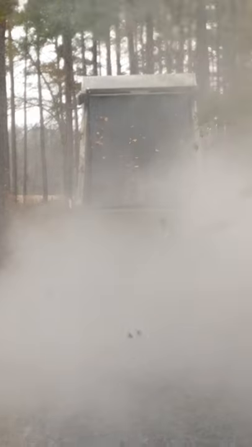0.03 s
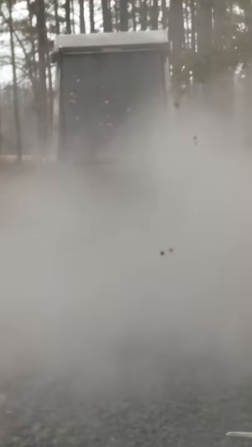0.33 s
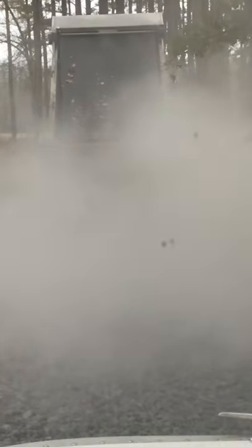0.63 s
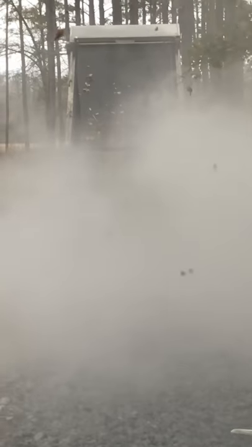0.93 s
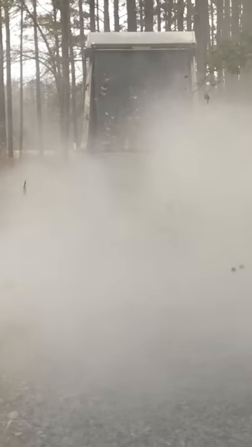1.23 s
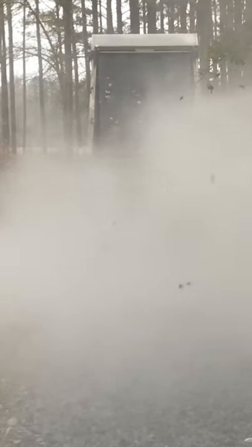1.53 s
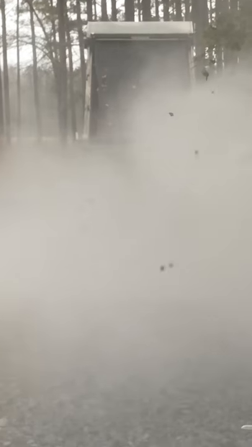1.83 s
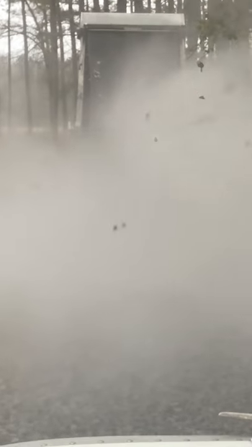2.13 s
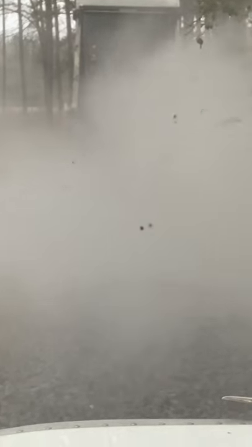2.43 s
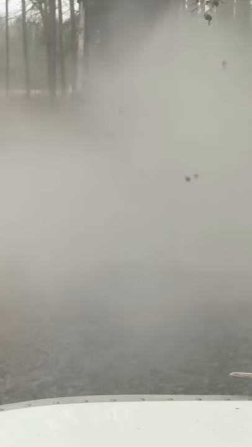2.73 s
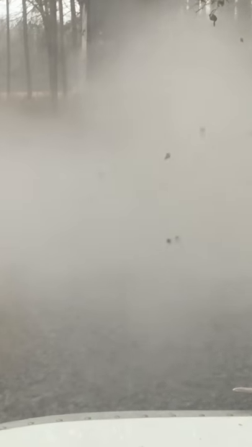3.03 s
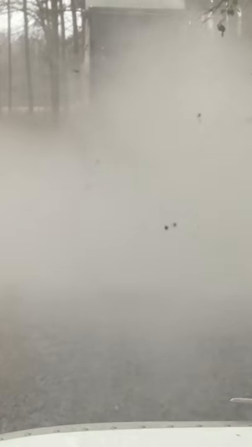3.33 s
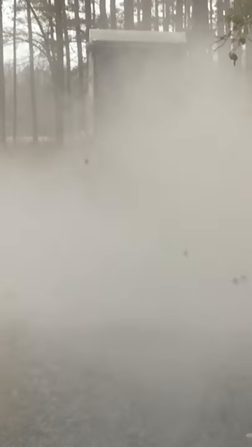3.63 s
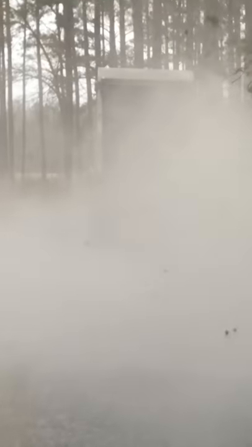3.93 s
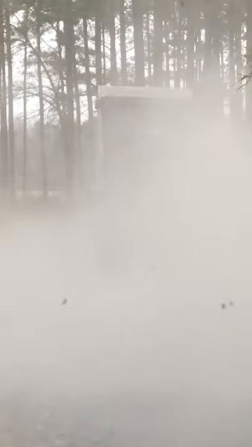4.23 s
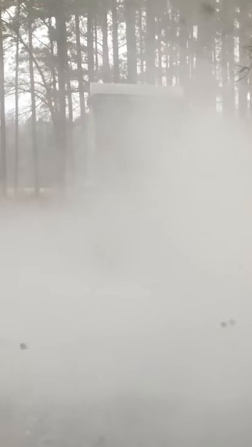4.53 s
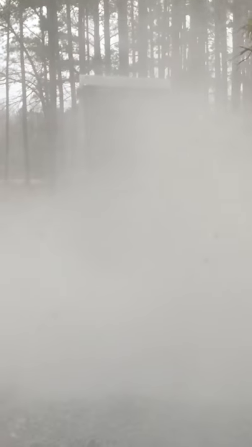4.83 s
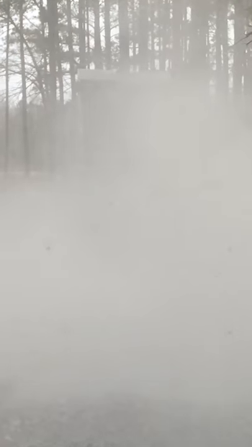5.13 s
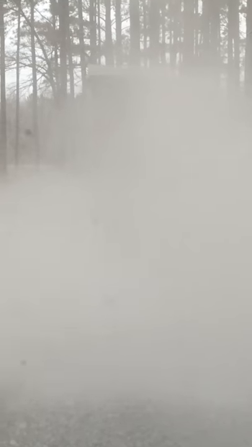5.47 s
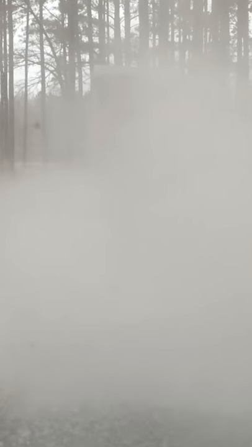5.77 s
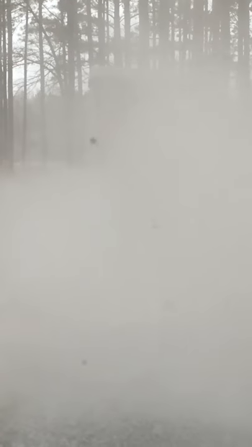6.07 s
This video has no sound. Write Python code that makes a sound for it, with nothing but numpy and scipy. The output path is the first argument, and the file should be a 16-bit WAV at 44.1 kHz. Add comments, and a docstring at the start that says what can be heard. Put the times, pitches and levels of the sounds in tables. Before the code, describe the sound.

A rush of tipped stone fades under droning engines while a vehicle cab knocks, thuds and rattles over loose gravel.

```python
"""A forest track, the microphone inside a vehicle following a dump truck that spreads gravel.
Ahead, stone pours in a dense rush, rings the steel dump body and runs out. Both engines drone on
over the rumble and crunch of tyres on loose stone. Close by, the cab jolts on the fresh gravel:
its body knocks, the floor thuds, loose parts clack and tinkle, and the trim squeaks."""
import sys
import numpy as np
from scipy import signal
from scipy.fft import rfft, irfft, next_fast_len
from scipy.io import wavfile

SR = 44100
rng = np.random.default_rng(int(sys.argv[2]) if len(sys.argv) > 2 else 0)


def transcribe(u):
    """Save the signal u as a 16-bit wav file named by the first command-line argument.

    u: samples, shape (n,) or (channels, n), limited to [-1, 1]; the rate is SR.
    q: integer samples, one column per channel.
    """
    v = np.clip(np.atleast_2d(u).T, -1, 1)
    q = np.round(v * 32767).astype(np.int16)
    wavfile.write(sys.argv[1], SR, q)


N = 273420
TIME = np.arange(N) / SR

# spectrum of the falling stone: frequency_hz, gain_db
POUR_COLOUR = [(120, -4), (175, 10), (260, -25), (380, -4.5), (700, -4.5), (850, -0.5), (1400, -2.5),
               (3650, -7), (5000, -15), (8500, -22), (10600, -30), (13000, -28), (16000, -36)]
# resonances of the steel dump body: pitch_hz, gain_db
DUMP_BODY_MODES = [(1000, 1), (1160, 0), (1380, 9), (1740, 6), (2480, 3), (3236, -1), (3700, 1)]
# slumps of the load that swell the flow: start_s, level_db
SLUMPS = [(0.762, -35), (1.168, -31.5), (1.581, -35), (1.72, -43), (2.04, -40)]
# exhaust of the truck ahead: time_s, firing_hz, level_db
TRUCK_DRONE = [(0, 100.5, -26.5), (.3, 101.1, -21), (.7, 102.2, -24.5), (.95, 102.6, -19.5),
               (1.33, 107.8, -26.5), (1.5, 105.5, -21), (1.68, 106.9, -26.5), (1.85, 106, -23),
               (2.13, 104.4, -25.5), (2.38, 101.7, -48), (2.6, 101.7, -26), (3.35, 106.1, -32.5),
               (4.1, 104, -40), (6.2, 95.1, -32.5)]
# throttle presses in the following vehicle: start_s, length_s, target_firing_hz
THROTTLE = [(1.94, 0.78, 42.35), (3.242, 1.07, 42.52), (5.165, .6, 41.22)]
# spells when its engine labours and the cab booms: start_s, length_s, level_db, growth_db_per_s
BOOMS = [(0, 1.97, -22, 2), (2.303, 0.31, -16, -21), (3.484, 0.85, -19.5, -3.5), (5.099, 0.22, -25, 21),
         (5.57, 0.244, -22, 8), (6.017, 0.32, -22.5, 10)]
# spectrum of the road rumble in the cab: frequency_hz, gain_db
ROAD_COLOUR = [(15, -26.5), (32, -3), (55, 2), (90, 7), (160, -6), (205, -4.5), (260, -14), (330, -10),
               (400, -16), (900, -62)]
# spectrum of stones under the tyres: frequency_hz, gain_db
CRUNCH_COLOUR = [(250, 4), (400, -6), (520, -0.5), (750, -2), (970, 0), (1300, -8), (1900, -13),
                 (2600, -14.5), (4000, -22.5), (5000, -26), (10500, -37), (16000, -46)]
# rough patches of track: start_s, length_s, boost_db
ROUGH_PATCHES = [(2.846, 0.31, 2.5), (5.05, 0.31, 2.5), (5.862, 0.39, 1.5)]
# knocks of the body around the microphone: start_s, level_db, ring_hz, ring_over_body_db, t60_s
KNOCKS = [(.068, -23, 1150, 2, 0.069), (0.499, -28.5, 1170, 7, 0.095), (0.867, -27.5, 1065, 13, 0.2),
          (2.235, -22, 1030, 7, 0.046), (2.643, -17.5, 910, 13, 0.03), (3.03, -36.5, 1370, -14, 0.34),
          (3.153, -24.5, 990, 12, 0.1), (3.932, -31.5, 983.4, 2, 0.075), (4.187, -30.5, 930, -2, 0.14),
          (5.21, -35, 640, 8, 0.2), (5.767, -31, 980, 0.5, 0.12), (6.022, -31.5, 800, 2, 0.072),
          (6.157, -30, 920, -4, 0.11)]
# modes of the following vehicle's body: pitch_hz, gain_db, t60_s
BODY_MODES = [(410, -6, 0.043), (615, 31.5, 0.04), (836, 29.5, 0.032), (1000, 29, 0.085),
              (1280, 29.5, 0.012), (1590, 2, 0.012), (2150, 1, 0.0098)]
# heavy jolts through the floor: start_s, level_db, ring_hz
THUDS = [(.002, -19.5, 202), (.425, -31, 426), (0.829, -23, 183), (.86, -27.5, 338.1), (1.115, -31, 360),
         (5.072, -25.5, 210), (5.629, -25, 201.1), (6.162, -27.5, 385)]
# loose parts clacking close by: start_s, level_db, t60_s, ring_hz
CLACKS = [(2.345, -46.5, 0.064, 9300), (2.576, -43, 0.056, 3330), (2.621, -43.5, 0.1, 3700),
          (2.638, -38.5, 0.066, 3880), (2.75, -53, .04, 14810), (3.092, -40, 0.039, 11600),
          (3.0986, -24, 0.015, 6200), (3.508, -52, 0.12, 6300), (3.731, -49, 0.03, 3960),
          (4.183, -42.5, 0.057, 3320), (4.218, -50, 0.036, 8560), (4.705, -36.5, .04, 4010),
          (4.724, -48, 0.14, 7080), (4.948, -45.5, 0.061, 2970), (5.143, -34.5, .05, 7100),
          (5.158, -40, .07, 8100), (5.259, -41, 0.083, 3720), (5.636, -44.5, 0.047, 5000),
          (5.767, -46, .1, 3400), (5.93, -44.5, .09, 3120), (6.063, -44.5, 0.079, 3535)]
# spectrum of a clack before its tilt: frequency_hz, gain_db
CLACK_COLOUR = [(500, -26), (1200, 6), (1600, 6), (3000, 7), (5000, 1.5), (8500, 0), (10500, -9),
                (12500, -2.5), (14000, -11), (16000, -24)]
# single stones under the wheels: start_s, level_db, ring_hz
CLATTERS = [(2.798, -36.5, 1501), (2.89, -37, 1380), (2.974, -39, 1290), (3.185, -44, 2603),
            (3.552, -38, 960), (4.589, -37, 1070), (5.076, -33.5, 1644), (5.33, -38.5, 1547),
            (6.125, -34.5, 1490)]
# small metal parts in the cab: start_s, level_db, first_mode_hz, second_mode_hz
TINKLES = [(2.487, -47, 13050, 7400), (2.526, -48, 12900, 7400), (2.967, -48, 13000, 7530),
           (4.074, -59, 11940, 9170), (5.733, -61, 9150, 11750), (5.979, -45, 9090, 11850)]
# squeaks of the trim: start_s, length_s, pitch_hz, level_db
SQUEAKS = [(3.207, 0.024, 5140, -68), (3.406, 0.049, 5150, -61), (4.18, 0.046, 5180, -56),
           (4.47, 0.056, 5110, -61), (4.775, .025, 5260, -60), (5.224, 0.052, 5190, -53.5),
           (5.475, 0.045, 5140, -52.5), (5.751, 0.023, 5240, -52.5)]
# soft scuffs in the cab: peak_s, level_db
SCUFFS = [(2.09, -50), (2.55, -57), (3.38, -49.5), (4.56, -56)]

FLOW_DB, THINNING_DB_PER_S, RUN_OUT_S, RUN_OUT_DB_PER_S = -30, 5, 2.3, 30
WHINE_TOP_S, WHINE_HALF_S, WHINE_HZ, WHINE_SAG_HZ = 1.8, 0.57, 810, 28.25
WHINE_DB, WHINE_FADE_DB = -45.5, 7.5
CRAWL_HZ, REV_UP_S, REV_DOWN_S, COASTING_DB = 32.06, 0.16, 0.42, -27
CAB_RESONANCE_HZ, CAB_HALF_WIDTH_HZ, OFF_THROTTLE_DB = 88.2, 6.5, -5.5
ROAD_DB, CRUNCH_DB = -26.5, -40.5
CLACK_PIVOT_HZ, CLACK_SNAP_DB, CLACK_RING_DB = 5600, 14.5, -10.5
SQUEAK_GLIDE_PER_S, SQUEAK_TRAIL_S, SQUEAK_FADE_DB_PER_S = 0.29, 0.014, 112


def amp(db):
    """Decibels to gain."""
    return 10 ** (np.asarray(db) / 20)


def unit(x):
    """Scales to rms 1."""
    return x / np.sqrt(np.mean(x ** 2) + 1e-20)


def phase_of(hz):
    """Running phase of a changing pitch, in radians."""
    return 2 * np.pi * np.cumsum(hz) / SR


def add(mix, start_s, sound):
    """Mixes a sound in at start_s."""
    part = mix[max(round(start_s * SR), 0):][:len(sound)]
    part += sound[:len(part)]


def spell(start_s, length_s, rise_s, fall_s):
    """An envelope that ramps up, holds to the end of its length and dies away."""
    age = TIME - start_s
    return np.clip(age / rise_s, 0, 1) * np.exp(-np.maximum(age - length_s, 0) / fall_s)


def colour(x, points):
    """Causal filter through points of frequency_hz, gain_db."""
    size = next_fast_len(len(x) + SR // 2)
    hz, db = np.transpose(points)
    bins_hz = abs(np.fft.fftfreq(size, 1 / SR))
    log_gain = np.log(amp(np.interp(np.log(bins_hz + 1), np.log(hz + 1), db)))
    minimum_phase = np.exp(np.conj(signal.hilbert(log_gain)))
    return np.fft.ifft(np.fft.fft(x, size) * minimum_phase).real[:len(x)]


def drift(hz):
    """Slow random motion of rms 1, up to about the given rate."""
    lowpass = np.exp(-(np.fft.rfftfreq(N, 1 / SR) / hz) ** 2)
    return unit(irfft(rfft(rng.standard_normal(N)) * lowpass, N))


def ring(x, hz, t60):
    """One damped mode, with gain 1 at its centre."""
    r = np.exp(-np.log(1000) / (t60 * SR))
    return 2 * signal.lfilter([1 - r], [1, -r * np.exp(2j * np.pi * hz / SR)], x).real


def resonate(x, hz, t60):
    """The same mode twice over, for steeper skirts, at rms 1."""
    return unit(ring(ring(x, hz, t60), hz, t60))


def impacts(per_s, spread_db):
    """Random clicks: many small, a few large."""
    size = amp(spread_db * np.minimum(rng.exponential(1, N), 4.5))
    return unit(size * rng.choice([-1, 1], N) * (rng.random(N) < per_s / SR))


def chatter(t60, rise_s, grain):
    """Rapid uneven contacts and, separately, the envelope of their dying burst."""
    t = np.arange(SR // 3) / SR
    noise = rng.standard_normal(len(t))
    roughness = np.exp(grain * np.repeat(rng.standard_normal(len(t)), 64)[:len(t)])
    fade = (1 - np.exp(-t / rise_s)) * np.exp(-np.log(1000) * t / t60)
    return unit(noise * roughness), fade


def stray_stones(per_s, low_hz, high_hz, t60, db, start_s):
    """Irregular hits from start_s on, each at its own pitch and up to 10 dB above db."""
    out = np.zeros(N)
    slots = np.arange(start_s, N / SR, 1 / per_s)
    for s, (late, pitch, size) in zip(slots, rng.random((len(slots), 3))):
        force, fade = chatter(t60, rise_s=t60 / 20, grain=0.78)
        hz = low_hz * (high_hz / low_hz) ** pitch
        add(out, s + late / per_s, amp(db + 10 * size) * resonate(force, hz, t60=0.004) * fade)
    return out


def gravel_pour():
    """Ahead, stones ring the steel body and land among larger lumps; the flow thins and runs out."""
    grains = impacts(per_s=5000, spread_db=1) + amp(-4) * rng.standard_normal(N)
    landing = unit(colour(grains, POUR_COLOUR))
    lumps = unit(stray_stones(per_s=45, low_hz=900, high_hz=1900, t60=0.05, db=0, start_s=0))
    strikes = impacts(per_s=1100, spread_db=2.5)
    modes = sum(amp(db) * ring(strikes, hz, t60=0.071) for hz, db in DUMP_BODY_MODES)
    wander_hz = 17.67 * drift(5.8)  # the modes shift as the load slides
    steel = unit((signal.hilbert(modes) * np.exp(1j * phase_of(wander_hz))).real)
    run_out_db = RUN_OUT_DB_PER_S * np.maximum(TIME - RUN_OUT_S, 0)
    steady = amp(FLOW_DB - THINNING_DB_PER_S * TIME - run_out_db)
    slumps = sum(amp(db) * spell(s, length_s=0.14, rise_s=0.029, fall_s=0.12) for s, db in SLUMPS)
    flow = np.hypot(steady, slumps) * amp(0.87 * drift(25))
    return flow * (landing + amp(-8.5) * steel + amp(-12) * lumps)


def dump_truck():
    """The exhaust drones up the track; as the truck tips, a thin whine arches in pitch and level."""
    times, firing_hz, level_db = np.transpose(TRUCK_DRONE)
    exhaust = np.sin(phase_of(np.interp(TIME, times, firing_hz)))
    drone = amp(np.interp(TIME, times, level_db)) * exhaust * (1 + 0.17 * drift(9.9))
    arch = np.minimum(((TIME - WHINE_TOP_S) / WHINE_HALF_S) ** 2, 10)
    whine_hz = (WHINE_HZ - WHINE_SAG_HZ * arch) * (1 + 0.0055 * drift(37))
    whine = amp(WHINE_DB - WHINE_FADE_DB * arch) * np.sin(phase_of(whine_hz))
    return np.sqrt(2) * (drone + whine)


def revs():
    """The near engine's firing rate climbs quickly under throttle and sinks slowly to a crawl."""
    hz = np.full(N, CRAWL_HZ)
    for s, length, target_hz in THROTTLE:
        pressed_s = np.clip(TIME - s, 0, length)
        released_s = np.maximum(TIME - s - length, 0)
        climb = target_hz + (np.interp(s, TIME, hz) - target_hz) * np.exp(-pressed_s / REV_UP_S)
        hz = np.where(TIME < s, hz, CRAWL_HZ + (climb - CRAWL_HZ) * np.exp(-released_s / REV_DOWN_S))
    return hz


def near_engine():
    """From the cab: the firing tone booms under load, its octave where it meets the cab's resonance."""
    hz = revs()
    phase = phase_of(hz * (1 + 0.0055 * drift(8.3)))
    boom = sum(amp(db + growth * np.clip(TIME - s, 0, length))
               * spell(s, length, rise_s=0.053, fall_s=0.045) for s, length, db, growth in BOOMS)
    coasting = amp(COASTING_DB) * (1 + 0.42 * drift(4.8))
    firing = np.maximum(boom, coasting) * np.sin(phase) * (1 + 0.12 * drift(4))
    detuning = (2 * hz - CAB_RESONANCE_HZ) / CAB_HALF_WIDTH_HZ
    cab_gain = amp(-29.5) + amp(-27) / (1 + detuning ** 2)
    throttle = sum(spell(s, length, REV_UP_S, fall_s=0.045) for s, length, _ in THROTTLE)
    octave_gain = cab_gain * amp(OFF_THROTTLE_DB * (1 - throttle))
    octave = octave_gain * np.sin(2 * phase + 1) * (1 + 0.09 * drift(4.5))
    upper_orders = sum(np.sin(k * phase) * (1 + drift(6.1) / 2) for k in range(3, 8))
    hum = 3 * np.sin(7.68 * phase)
    upper_gain = amp(-49.5 + 0.5 * (hz - 49))  # faint, rising with the revs
    return np.sqrt(2) * (firing + octave + upper_gain * (upper_orders + hum))


def road_rumble():
    """Tyres on loose stone shake the cab."""
    return amp(ROAD_DB) * unit(colour(rng.standard_normal(N), ROAD_COLOUR))


def tyre_crunch():
    """Below the cab, stones grind in clumps, harder on rough patches, and some knock together."""
    clumps = impacts(per_s=1500, spread_db=3.8) * amp(2.5 * drift(28))
    grinding = unit(colour(clumps + amp(5.5) * rng.standard_normal(N), CRUNCH_COLOUR))
    pebbles = stray_stones(per_s=24, low_hz=650, high_hz=3000, t60=0.06, db=-53, start_s=RUN_OUT_S)
    boost_db = sum(db * spell(s, length, rise_s=0.081, fall_s=0.34) for s, length, db in ROUGH_PATCHES)
    return amp(boost_db) * (amp(CRUNCH_DB + 0.37 * drift(1.13)) * grinding + pebbles)


def body_knocks():
    """Each jolt strikes and then rattles the body's modes, and one panel rings at its own pitch."""
    out = np.zeros(N)
    padding = signal.butter(2, 3800, fs=SR, output="sos")  # a padded contact dulls the blow
    for s, db, hz, ring_db, t60 in KNOCKS:
        force, fade = chatter(t60, rise_s=0.0032, grain=0.07)
        strike = 8 * signal.unit_impulse(len(force), SR // 500)
        blow = signal.sosfilt(padding, force * fade + strike)
        body = sum(amp(mode_db) * ring(blow, f, decay) for f, mode_db, decay in BODY_MODES)
        knock = unit(unit(body) + amp(ring_db) * resonate(blow, hz, t60=0.007))
        add(out, s - 0.002, amp(db) * knock * np.sqrt(np.mean(fade ** 2)))
    return out


def floor_thuds():
    """Heavy jolts shake the floor: dull, rough and quickly damped."""
    out = np.zeros(N)
    for s, db, hz in THUDS:
        force, fade = chatter(t60=0.2, rise_s=0.0055, grain=0.24)
        add(out, s, amp(db) * resonate(force, hz, t60=0.012) * fade)
    return out


def panel_boom(start_s=3.005, length_s=0.12, pitch_hz=292, level_db=-20):
    """On one jolt a broad panel swells into a short hollow boom."""
    out = np.zeros(N)
    t = np.arange(round(length_s * SR)) / SR
    add(out, start_s, amp(level_db) * np.hanning(len(t)) * np.sin(2 * np.pi * pitch_hz * t))
    return out


def loose_clacks():
    """Hard loose parts near the microphone snap, chatter and ring; smaller ones sound brighter."""
    out = np.zeros(N)
    for s, db, t60, hz in CLACKS:
        force, fade = chatter(t60, rise_s=0.00012, grain=0.18)
        force += amp(CLACK_SNAP_DB) * signal.unit_impulse(len(force), SR // 1000)
        tilt_db_per_octave = 5.5 * np.log2(hz / CLACK_PIVOT_HZ)
        shape = [(f, gain + tilt_db_per_octave * np.log2(f / CLACK_PIVOT_HZ)) for f, gain in CLACK_COLOUR]
        clack = unit(colour(force, shape)) + amp(CLACK_RING_DB) * resonate(force, hz, t60=0.0019)
        add(out, s, amp(db) * unit(clack) * fade)
    return out


def stone_clatters():
    """Single stones shift against their neighbours: a gritty burst with one broad resonance."""
    out = np.zeros(N)
    for s, db, hz in CLATTERS:
        force, fade = chatter(t60=0.12, rise_s=0.0039, grain=0.16)
        grit = amp(-12) * unit(colour(force, POUR_COLOUR))
        add(out, s, amp(db) * (resonate(force, hz, t60=0.0056) + grit) * fade)
    return out


def metal_tinkles():
    """Small metal parts tick and ring, each with two high modes."""
    out = np.zeros(N)
    for s, db, first_hz, second_hz in TINKLES:
        force, fade = chatter(t60=0.049, rise_s=0.001, grain=0.3)
        modes = resonate(force, first_hz, t60=0.005) + amp(-3) * resonate(force, second_hz, t60=0.005)
        add(out, s, amp(db) * unit(modes + force / 2) * fade)
    return out


def trim_squeaks():
    """The trim sticks and slips: a rough, gliding chirp with a weak octave above and below."""
    out = np.zeros(N)
    waver = 0.013 * drift(310)
    grip = amp(6.4 * drift(97))
    for s, length, hz, db in SQUEAKS:
        span = (TIME > s) & (TIME < s + length + SQUEAK_TRAIL_S)
        age = TIME[span] - s
        glide = SQUEAK_GLIDE_PER_S * (1 + rng.standard_normal() / 2) * (age - length / 2)
        phase = phase_of(hz * (1 + glide + waver[span]))
        tone = np.sin(phase) + amp(-20) * np.sin(2 * phase) + amp(-10) * np.sin(phase / 2)
        fade = amp(-SQUEAK_FADE_DB_PER_S * age) * signal.windows.tukey(len(age), 0.4)
        add(out, s, amp(db) * unit(tone * grip[span] * fade))
    return out


def scuffs(rise_db_per_s=179, fall_db_per_s=172):
    """Soft, bright scuffs swell and die away in the cab."""
    level = sum(amp(db - np.maximum(rise_db_per_s * (s - TIME), fall_db_per_s * (TIME - s)))
                for s, db in SCUFFS)
    bright = [(1500, -20), (4200, 1), (8000, -9.5), (11000, -12), (15000, -13)]  # frequency_hz, gain_db
    return level * unit(colour(impacts(per_s=30000, spread_db=1), bright))


def cab_reflections(x, t60, wet_db):
    """The direct sound, then dense, quickly dying reflections off the windows."""
    t = np.arange(SR // 4) / SR
    echoes = rng.standard_normal(len(t)) * (rng.random(len(t)) < 2000 / SR)
    taps = echoes * (t > 0.003) * np.exp(-np.log(1000) * t / t60)
    return x + amp(wet_db) * signal.fftconvolve(x, taps / np.linalg.norm(taps))[:N]


def scene():
    """One microphone in the cab: engines, road and stone outside; rattles, thuds and scuffs inside."""
    rattles = body_knocks() + loose_clacks() + trim_squeaks() + metal_tinkles()
    rattles = cab_reflections(rattles, t60=0.076, wet_db=1.5)
    outside = near_engine() + dump_truck() + road_rumble()
    outside += gravel_pour() + tyre_crunch() + stone_clatters()
    inside = rattles + floor_thuds() + panel_boom() + scuffs()
    return (outside + inside)[None]


def record(dry):
    """The recorder's band limit takes off the highest treble."""
    lowpass = signal.firwin(511, cutoff=15850, window=("kaiser", 9), fs=SR)
    return signal.oaconvolve(dry, lowpass[None], "same")


dry = scene()
out = record(dry)
transcribe(out)
```